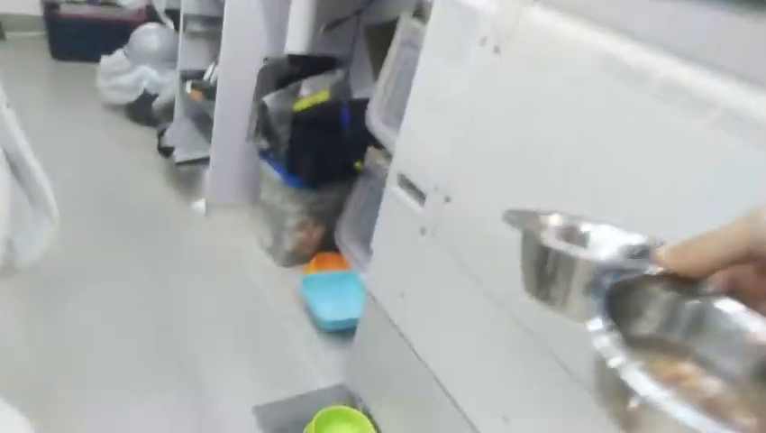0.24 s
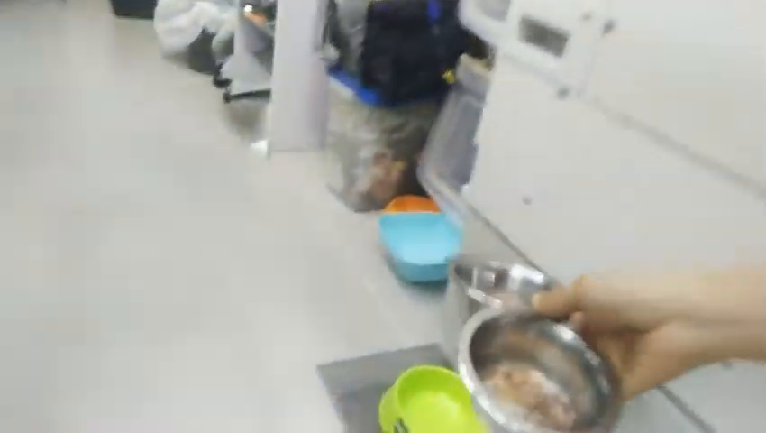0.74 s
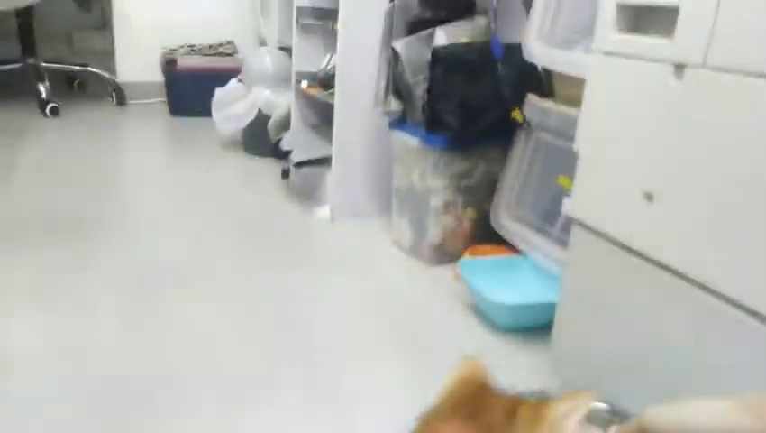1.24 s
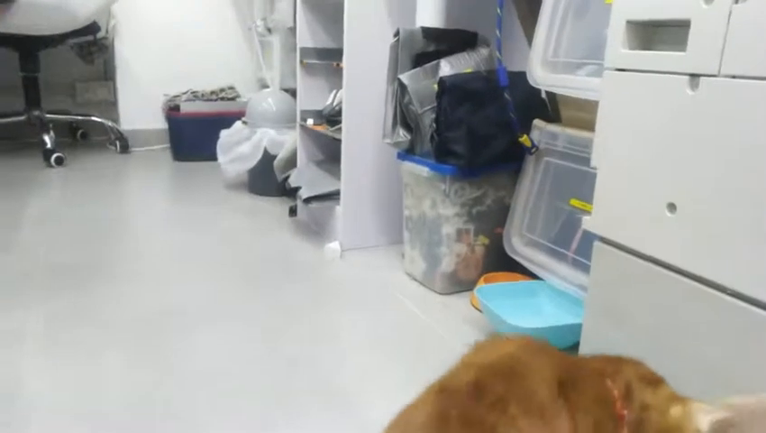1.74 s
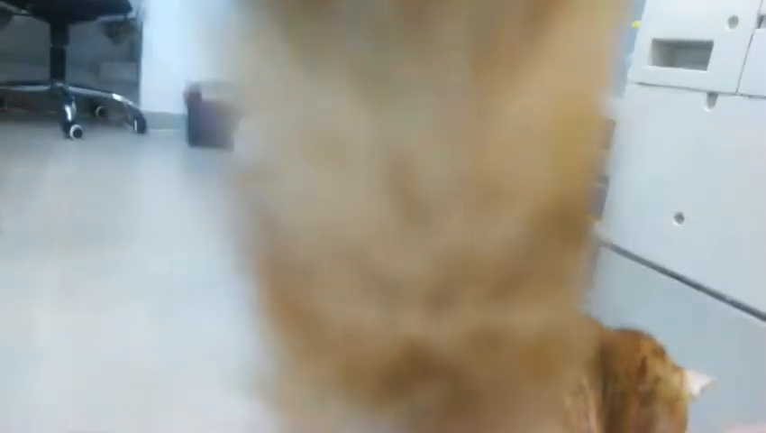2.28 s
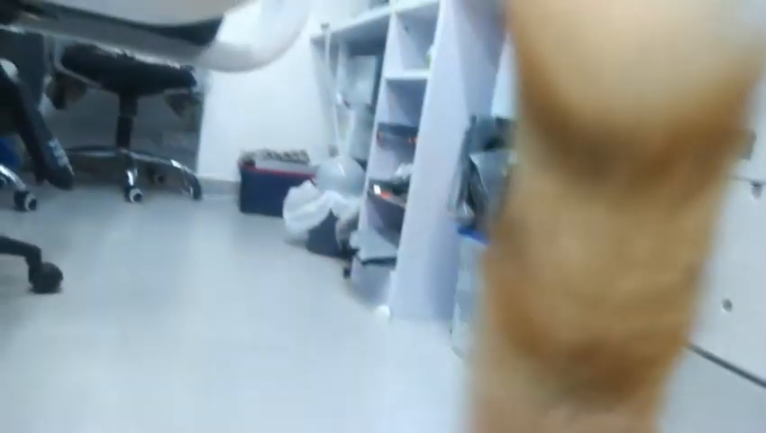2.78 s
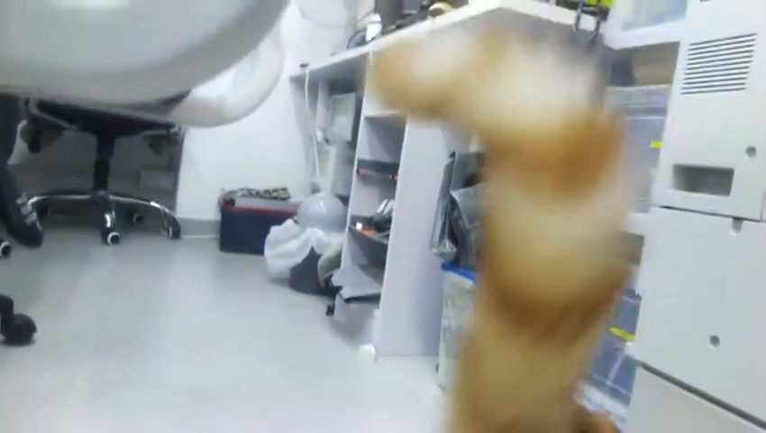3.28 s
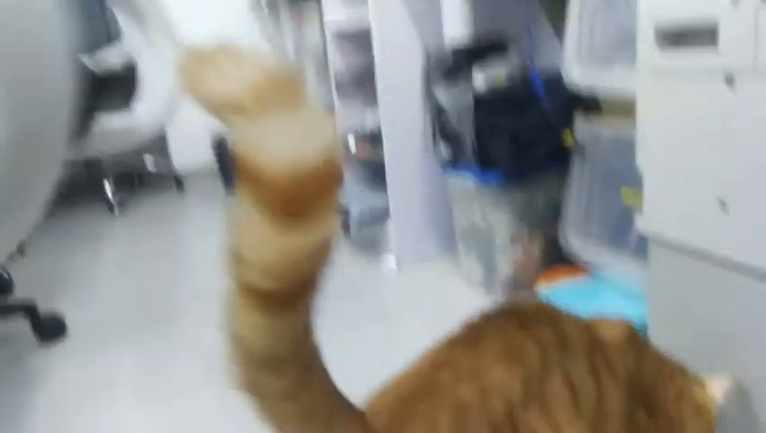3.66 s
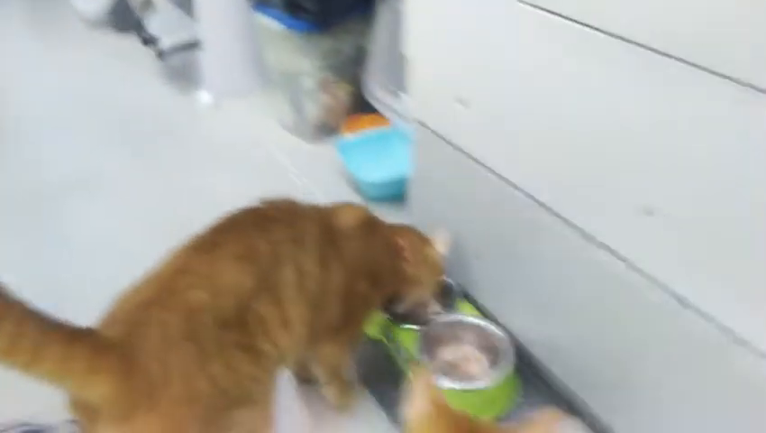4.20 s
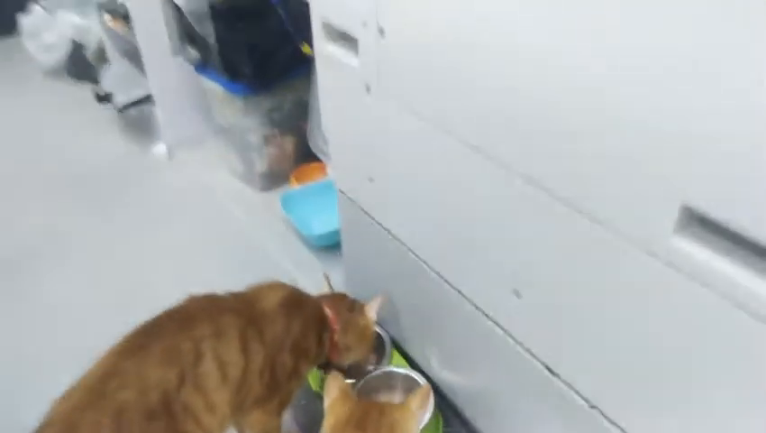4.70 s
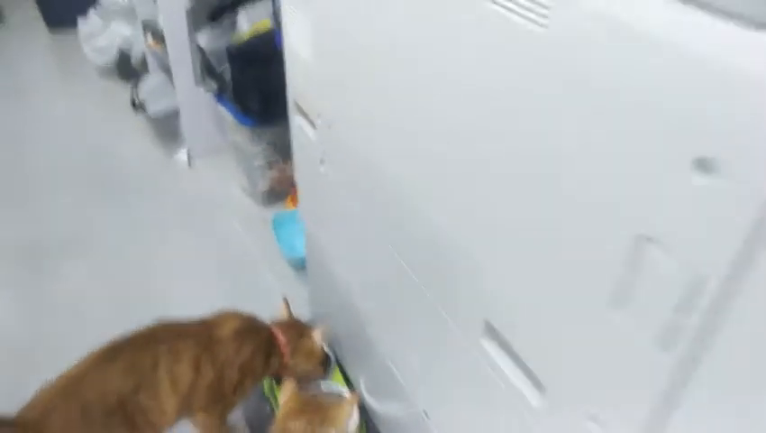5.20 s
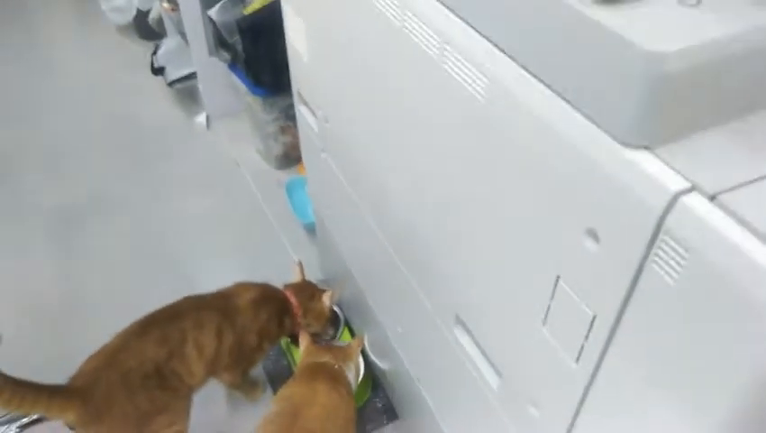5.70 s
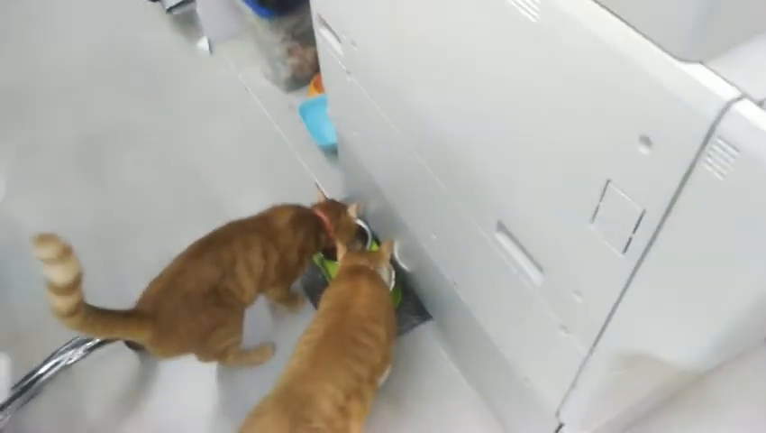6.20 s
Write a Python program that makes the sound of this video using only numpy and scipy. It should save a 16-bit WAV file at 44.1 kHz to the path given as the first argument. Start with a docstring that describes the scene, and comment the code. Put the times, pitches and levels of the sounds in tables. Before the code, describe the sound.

A fan hisses steadily throughout in a small, hard room, heard from a handheld microphone. In the first second, soles and clothes scuff softly, a faint, thin, high squeak comes and goes, and a bowl taps lightly. From about 1.2 to 1.7 seconds, two steel pet bowls are set into a plastic stand close by, with hollow knocks, short metallic rings and a brief echo. A tiny click at the microphone comes near 1.9 seconds, followed by more clatter at 2.1 to 2.2 seconds and a light knock at 2.7. Around 3 to 3.2 seconds the bowls rattle brightly, along with a scuff and a rustle of clothing. Quieter scuffs follow from about 4.3 to 5.7 seconds, with faint bowl taps near 5 seconds and a sharp double snap of the camera's case at 5.3. The hiss carries on alone until about 6.5 seconds.

```python
"""A small hard room, near a handheld camera. Two steel pet bowls are set down in a plastic stand, nudged and
rattled: each contact knocks the plastic, rings the steel and echoes briefly. A fan hisses throughout, soles and
clothes scuff with grainy friction, a bowl scrapes as it slides, something squeaks thinly, and the camera's case
snaps three times at the microphone."""
import sys
import numpy as np
from scipy import signal
from scipy.fft import rfft, irfft, next_fast_len
from scipy.io import wavfile
from scipy.ndimage import uniform_filter1d, map_coordinates

SR = 44100
rng = np.random.default_rng(int(sys.argv[2]) if len(sys.argv) > 2 else 0)


def pcm_store(signal):
    """Save signal as 16-bit PCM."""
    levels = np.round(np.clip(np.atleast_2d(signal), -1, 1) * 32767)
    wavfile.write(sys.argv[1], SR, levels.astype(np.int16).T)


N = 284312


def amp(db):
    """Decibels to gain."""
    return 10 ** (np.asarray(db) / 20)


def unit_rms(x):
    """Scale to rms 1."""
    return x / np.sqrt(np.mean(x ** 2) + 1e-20)


def curve_at(points, hz):
    """Interpolate (Hz, value) points on a log frequency axis."""
    points_hz, values = np.transpose(points)
    return np.interp(np.log(hz + 1), np.log(points_hz + 1), values)


def wobble(knots_per_s):
    """Smooth random curve."""
    knots = rng.standard_normal(int(N * knots_per_s / SR) + 4)
    return map_coordinates(knots, [np.arange(N) * knots_per_s / SR])


def filtered(x, gain_at_hz):
    """Zero-phase filter."""
    size = next_fast_len(N + SR // 2)
    return irfft(rfft(x, size) * gain_at_hz(np.fft.rfftfreq(size, 1 / SR)), size)[..., :N]


def patchy_noise(spectrum, patch_db):
    """Coloured noise of rms 1, its gain uneven over time and frequency."""
    bins = signal.stft(rng.standard_normal(N), nperseg=512)[2]
    patches = uniform_filter1d(rng.standard_normal(bins.shape), 6, axis=0)
    patches = uniform_filter1d(patches, 10, axis=1)
    noise = signal.istft(bins * amp(patch_db * unit_rms(patches)), nperseg=512)[1][:N]
    return unit_rms(filtered(noise, lambda hz: amp(curve_at(spectrum, hz))))


def burst(t, t60_s, db_at_hz):
    """Decaying coloured noise."""
    hz = np.fft.rfftfreq(len(t), 1 / SR)
    spectrum = rfft(rng.standard_normal(len(t))) * amp(db_at_hz(hz))
    return amp(-60 * t / t60_s) * unit_rms(irfft(spectrum, len(t)))


def swells(start_s, hold_s, rise_s, fall_s, peak_db, depth_db=20.5):
    """Gain per sample: each swell rises by depth_db up to start_s, holds, then falls away."""
    column = lambda values: np.reshape(values, (-1, 1))
    grid = np.arange(0, N + 32, 32)
    t = grid / SR - column(start_s)
    before = np.maximum(-t / column(rise_s), 0)
    after = np.maximum((t - column(hold_s)) / column(fall_s), 0)
    gain = amp(column(peak_db) - depth_db * (before + after) ** 1.05).sum(axis=0)
    return np.interp(np.arange(N), grid, gain)


# Each row: time in seconds, level in dB, share of power heard from close to the vent (0-1).
FAN_PATH = [(0.0, -49.5, 0.18), (0.2, -49.5, 0), (1.15, -50, 0.08), (1.38, -47.5, 0.09),
            (1.76, -49.5, 0.38), (2.23, -47.5, 0.44), (2.96, -49, 0.45), (3.14, -46.5, 0.53),
            (3.91, -50.5, 0.23), (5.12, -48.5, 0.11), (5.46, -48, 0.48), (6.12, -48.5, 0.57),
            (6.45, -48, 0.52)]
# Air across the room, then close to the vent. Each row: frequency in Hz, relative density in dB.
FAR_AIR_SPECTRUM = [(15, -69), (25, -48), (146, -27), (446, -26.5), (508, -22), (811, -8.5), (900, -8),
                    (1170, -4.5), (1330, -4), (1640, -2.5), (2970, -0.5), (3850, -5), (6650, -12.5),
                    (8400, -25.5), (12400, -21.5), (16100, -55), (22000, -120)]
VENT_SPECTRUM = [(15, -63), (25, -21), (119, -27), (392, -28), (676, -10.5), (731, -7.5), (1810, 3.5),
                 (2410, 3.5), (3210, -19.5), (4170, -8.5), (5990, -33), (7380, -24), (12400, -51),
                 (16100, -66), (22000, -120)]
# Each row: centre in Hz, width in Hz, boost in dB.
DUCT_RESONANCES = [(2200, 140, 1.5), (3040, 170, 1), (1360, 120, 0.35)]


def fan():
    """Steady air hiss, drifting a little; its colour narrows as the camera nears the vent."""
    t = np.arange(N) / SR
    times_s, levels_db, vent_shares = np.transpose(FAN_PATH)
    vent_share = np.interp(t, times_s, vent_shares)
    far = np.sqrt(1 - vent_share) * patchy_noise(FAR_AIR_SPECTRUM, patch_db=1.1)
    near = np.sqrt(vent_share) * patchy_noise(VENT_SPECTRUM, patch_db=2.5)
    air = filtered(far + near, lambda hz: amp(sum(
        db * np.exp(-((hz - centre_hz) / width_hz) ** 2) for centre_hz, width_hz, db in DUCT_RESONANCES)))
    drift_db = 0.24 * wobble(2.93) + 0.78 * wobble(7.4)
    return amp(np.interp(t, times_s, levels_db) + drift_db) * air


# Each row: start of the peak, hold, rise and fall in seconds, drag level in dB, fine hiss level in dB. Most
# rows are soles and cloth; the rows at 3.116 and 3.204 s are a bowl sliding and rattling.
SCUFF_STROKES = [ (0.017, 0.076, 0.028, 0.11, -43, -58), (0.255, 0.028, .015, 0.066, -58, -66),
                 (0.432, 0.042, 0.048, 0.11, -41, -51.5), (2.262, 0.017, 0.036, .02, -59, -69),
                 (3.116, .005, 0.0057, 0.063, -36.5, -41), (3.204, 0.014, 0.037, 0.068, -40, -36.5),
                 (4.33, .07, .08, 0.056, -46, -56.5), (4.576, 0.056, .09, 0.08, -44, -54),
                 (5.335, 0.022, 0.012, 0.17, -43, -53), (5.45, 0.11, 0.13, 0.12, -55, -64.5),
                 (5.619, 0.058, 0.044, .08, -51, -66), ]
# Sole drag, then fine cloth hiss. Each row: frequency in Hz, relative density in dB.
SOLE_SPECTRUM = [(350, -74), (600, -39), (749, -13), (887, -33), (925, -25), (1130, -13), (2870, -2),
                 (6470, -4), (7500, -8), (9750, -53), (16500, -120)]
CLOTH_SPECTRUM = [(4590, -40), (7800, -6), (11900, -4), (12400, -7), (16100, -28), (22000, -120)]


def scuffs():
    """Soles and cloth drag with grainy friction noise, and a bowl scrapes as it slides and rattles around
    3.1-3.2 s; the cloth hiss comes and goes faster."""
    *timing_s, sole_db, cloth_db = np.transpose(SCUFF_STROKES)
    grain = amp(1.3 * wobble(60) + 1.2 * wobble(500))
    sole = unit_rms(grain * patchy_noise(SOLE_SPECTRUM, patch_db=2.5))
    cloth = unit_rms(grain * patchy_noise(CLOTH_SPECTRUM, patch_db=4.0))
    return swells(*timing_s, sole_db) * sole + swells(*timing_s, cloth_db, depth_db=28.7) * cloth


# Each row: start of the peak in seconds, hold in seconds, level in dB.
SQUEAK_SWELLS = [(0.133, .05, -63), (0.203, .02, -57), (0.346, .004, -62), (0.545, .02, -66),
                 (0.787, 0.019, -57.5), (0.855, 0.026, -57), (.92, .01, -69)]


def squeak(centre_hz=7930, half_width_hz=35):
    """Thin, unsteady metallic squeak: noise in one narrow resonance."""
    start_s, hold_s, peak_db = np.transpose(SQUEAK_SWELLS)
    resonance = lambda hz: 1 / (1 + ((hz - centre_hz) / half_width_hz) ** 2)
    tone = unit_rms(filtered(rng.standard_normal(N), resonance))
    return swells(start_s, hold_s, rise_s=0.017, fall_s=0.036, peak_db=peak_db) * tone


def ring(modes, t, tilt_db_per_oct, ring_share, spot_hz, scatter_db):
    """One blow: a harder one tilts toward the high modes; a hand or the food damps them all."""
    hz, mode_db, t60_s = np.transpose(modes)[:, :, None]
    scatter, split = rng.standard_normal((2, len(modes), 1))
    spot_db = 6.5 * np.exp(-(np.log2(hz / spot_hz) / 0.18) ** 2)
    start_db = mode_db + tilt_db_per_oct * np.log2(hz / 2000) + spot_db + scatter_db * scatter
    envelope = amp(start_db - 60 * t / (t60_s * ring_share))
    # Asymmetry splits each mode into a beating pair.
    twin = 0.58 * np.sin(2 * np.pi * hz * (1 + 0.012 * split) * t)
    return (envelope * (np.sin(2 * np.pi * hz * t) + twin)).sum(axis=0)


# Each row: start in seconds, stand level in relative dB, its tilt in dB/octave, bowl level in
# relative dB, its tilt in dB/octave, share of full ring length, Hz favoured by the spot struck.
BOWL_CONTACTS = [ (0.514, -29.5, 9, -44.5, -5, 0.36, 3170), (1.2127, -12, 2.5, -34, -1, 0.5, 3100),
                 (1.2176, -9, -5, -24, -6.5, 0.8, 1310), (1.244, -23.5, -11.5, -44, -1, 0.57, 6200),
                 (1.2809, -12, -8, -50, -5, 0.45, 1090), (1.4167, -30, 6, -52, -6, 0.19, 3300),
                 (1.4588, -21.5, 7, -20.5, 1.5, 0.46, 5400), (1.463, -25, 13, -22.5, -7, 0.36, 790),
                 (1.646, -32, -3, -39, -7, 0.39, 1220), (1.955, -41, -6, -63, -4, 1, 700),
                 (2.070, -21, -4, -31.5, -6, 0.89, 1040), (2.082, -18.5, -6.5, -39, -11, 0.71, 1410),
                 (2.186, -15.5, 3.5, -23.5, -7, 0.27, 1970), (2.192, -21, -10, -32, -8, 0.35, 1910),
                 (2.202, -38, -14, -54, -7, 0.53, 564), (2.7067, -31.5, -10, -37, -7, 0.65, 594),
                 (2.713, -33, -10, -54, -9, 0.22, 740), (3.039, -26, -10, -17, 1, 0.85, 2120),
                 (3.0786, -23, -11, -10, -1, 0.45, 3060), (3.095, -20.5, -6, -31, -10, 0.46, 1360),
                 (3.117, -31, -10.5, -37, -4, 1, 5020), (3.160, -27.5, -2.5, -31.5, -8, 0.86, 1840),
                 (3.178, -36, -3, -34, 0, 0.86, 5020), (3.1963, -23, -11.5, -33, -7, 0.76, 596),
                 (3.202, -25, -9, -23, -8, 0.24, 2070), (3.221, -45, 13, -34.5, -5, 0.92, 12200),
                 (5.024, -36.5, 0, -58, 2, 0.84, 1190), (5.05, -44, 4, -47, -3, 0.81, 1220),
                 (5.346, -32.5, -5, -43, -8, 0.74, 1000), ]
# Plastic stand, then steel bowl. Each row: frequency in Hz, relative dB, full-length t60 in seconds.
STAND_MODES = [(432, -18.5, 0.021), (602, -2.5, 0.017), (753, -14, 0.054), (961, -8, 0.063),
               (1062, -4.5, 0.046), (1163, -6, 0.044), (1401, -1.5, 0.047), (1757, 0, 0.036),
               (2016, -6.5, 0.092), (2165, -1.5, 0.041), (2340, -8.5, 0.1), (2470, -7.5, 0.08),
               (3194, 1.5, 0.017)]
BOWL_MODES = [(702, 0.5, 0.084), (1271, -1.5, 0.12), (2060, 1.5, 0.08), (3055, -5, 0.073),
              (3900, -0.5, 0.047), (4350, -16, 0.019), (4940, 0.5, 0.027), (5860, -11, 0.073),
              (6010, -13, 0.026), (7180, -6.5, 0.059), (7800, -36, .05), (8300, -11, 0.067),
              (9600, -23, 0.064), (10500, -19, 0.12), (10640, -29, 0.073), (12870, -47, 0.21)]
# The plastic's dense, dead modes. Each row: frequency in Hz, relative density in dB.
CLACK_SPECTRUM = [(200, -39), (700, 13.5), (1500, 13), (3500, -0.5), (6500, -16), (12000, -67)]


def bowls():
    """Each contact knocks the stand, rings the bowl, cracks briefly and fills the room."""
    out, t = np.zeros(N + SR), np.arange(SR // 5) / SR
    octaves = lambda hz: np.log2((hz + 500) / 2500)
    for start_s, stand_db, stand_tilt, bowl_db, bowl_tilt, ring_share, spot_hz in BOWL_CONTACTS:
        knock = amp(stand_db - 11) * ring(STAND_MODES, t, stand_tilt, ring_share, spot_hz, scatter_db=0.7)
        clink = amp(bowl_db - 13.5) * ring(BOWL_MODES, t, bowl_tilt, ring_share, spot_hz, scatter_db=0)
        # The surfaces meet, then chatter for a few milliseconds.
        chatter = burst(t[:400], 0.0073, np.zeros_like)
        chatter[0] += 14
        ringing = signal.fftconvolve(knock + clink, chatter / np.linalg.norm(chatter))[:len(t)]
        clack_db = lambda hz: curve_at(CLACK_SPECTRUM, hz) + stand_tilt * octaves(hz)
        clack = amp(stand_db - 6.5) * burst(t, 0.071 * ring_share, clack_db)
        crack = amp(bowl_db - 6) * burst(t, 0.043 * ring_share, lambda hz: bowl_tilt * octaves(hz))
        floor_thud = amp(stand_db - 11 - 60 * t / 0.03)
        attack = 1 - np.exp(-t / 0.00069)
        hit = (ringing + clack + crack + floor_thud) * attack
        echo = amp(-9.5) * room(hit)
        at = round(start_s * SR)
        out[at:at + len(hit)] += hit
        out[at:at + len(echo)] += echo
    return out[:N]


# Each row: frequency in Hz, t60 in seconds.
ROOM_DECAY = [(300, 0.23), (800, .16), (2000, 0.22), (6000, 0.19), (12000, 0.09)]


def room(x, delay_samples=130):
    """A fresh diffuse tail, each frequency dying at its own rate."""
    hz, t, bins = signal.stft(rng.standard_normal(SR // 3), SR, nperseg=256)
    decay = amp(-60 * t / curve_at(ROOM_DECAY, hz)[:, None])
    tail = signal.istft(bins * decay, SR, nperseg=256)[1]
    return signal.fftconvolve(np.pad(x, (delay_samples, 0)), tail / np.linalg.norm(tail))


# Each row: start in seconds, relative level in dB, mode in Hz, thump in dB re the mode,
# mode t60 in seconds.
CASE_SNAPS = [(1.8659, 7.5, 5150, -64, 0.00053), (5.2921, 18.5, 4900, -5.5, 0.00071),
              (5.3142, 25, 5000, -50, 0.00037)]


def case_snaps():
    """The camera case snaps at the microphone: a few cycles of one stiff mode, a thump and a jolt."""
    out, t = np.zeros(N), np.arange(SR // 50) / SR
    attack = 1 - np.exp(-t / 0.00032)
    for start_s, level_db, mode_hz, thump_db, t60_s in CASE_SNAPS:
        mode = amp(-60 * t / t60_s) * np.sin(2 * np.pi * mode_hz * t)
        thump = amp(thump_db - 60 * t / 0.00095) * np.sin(2 * np.pi * 1450 * t)
        jolt = amp(-45.5 - 60 * t / 0.019)
        at = round(start_s * SR)
        out[at:at + len(t)] -= amp(level_db) * attack * (mode + thump + jolt)
    return out


# Each row: frequency in Hz, gain in dB.
IMPACT_EQ = [(30, -46), (150, -26.5), (400, -15), (800, -4.5), (6800, 8), (8200, -1), (11600, 6.5),
             (12400, -12)]


def impact_colour(x):
    """The impacts' colour: thin bass, bright treble, cut off steeply near 12 kHz."""
    gain = amp(curve_at(IMPACT_EQ, np.fft.rfftfreq(4096, 1 / SR)))
    cepstrum = irfft(np.log(gain))
    cepstrum[1:2048] *= 2  # folding makes the filter causal
    cepstrum[2049:] = 0
    impulse = irfft(np.exp(rfft(cepstrum)))
    return signal.fftconvolve(x, impulse)[:N]


def scene():
    """One mono mix on both channels."""
    mono = impact_colour(bowls() + case_snaps()) + scuffs() + squeak() + fan()
    return np.array([mono, mono])


def record(dry):
    """Round off the loudest peaks, then limit the band."""
    ceiling, top_hz, edge_hz = 0.9, 12420, 120
    rounded = dry / (1 + np.abs(dry / ceiling) ** 6) ** (1 / 6)
    return filtered(rounded, lambda hz: np.clip(0.5 + (top_hz - hz) / edge_hz, 0, 1))


dry = scene()
out = record(dry)
pcm_store(out)
```